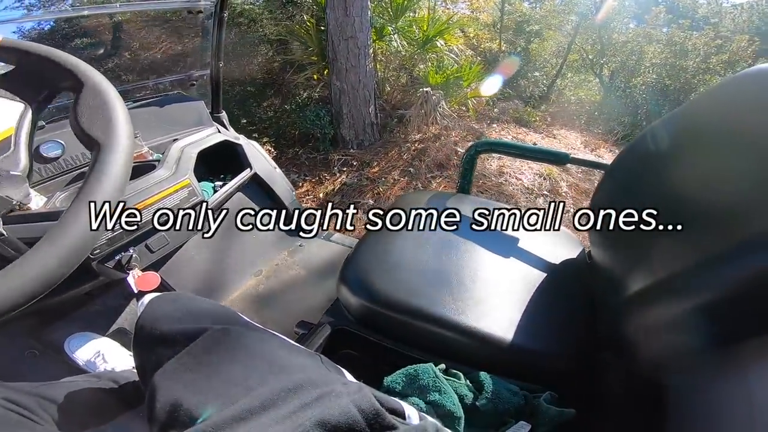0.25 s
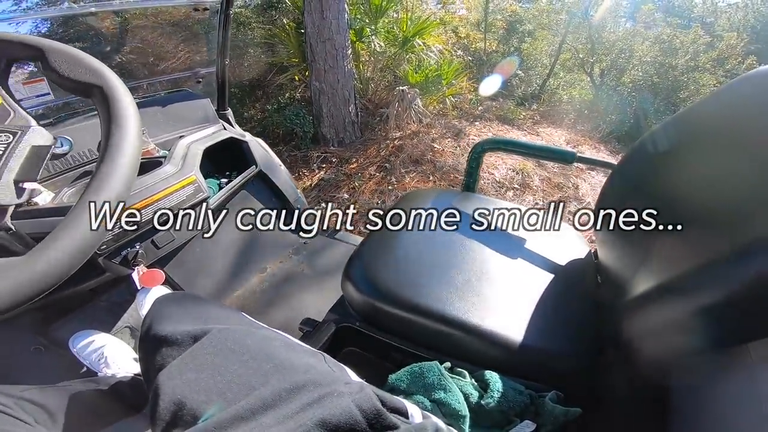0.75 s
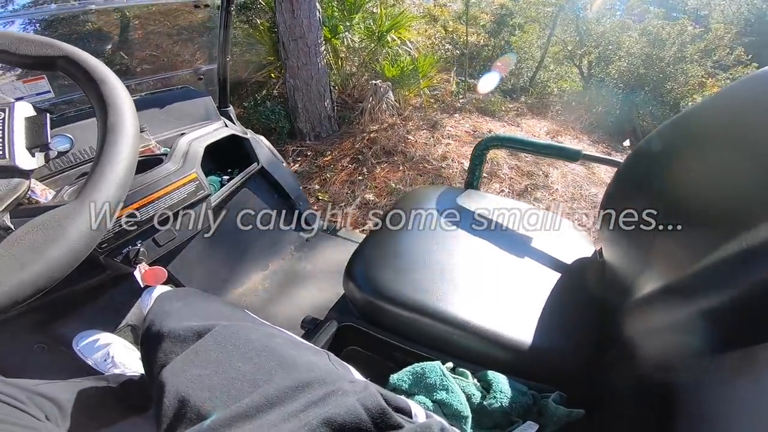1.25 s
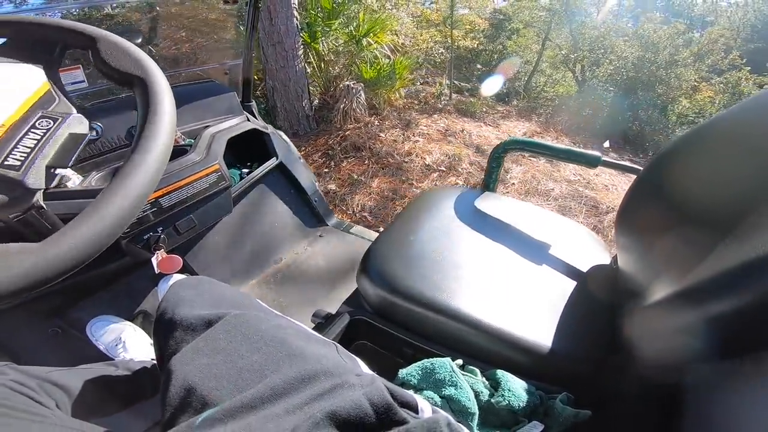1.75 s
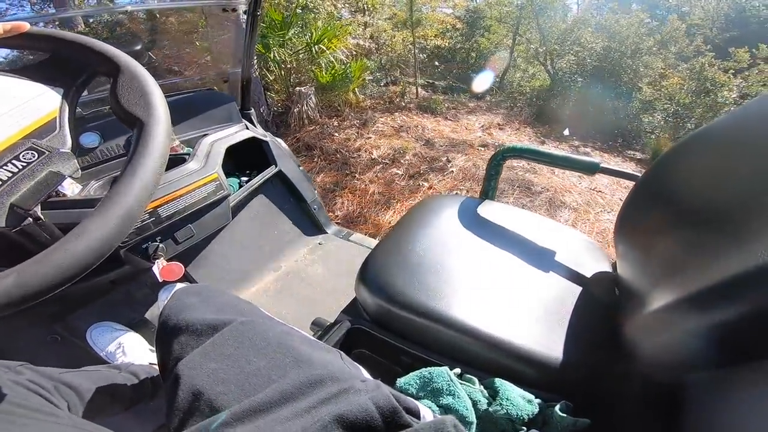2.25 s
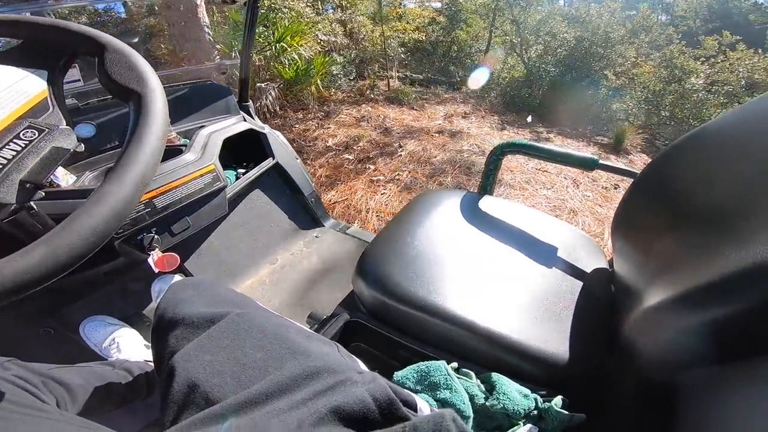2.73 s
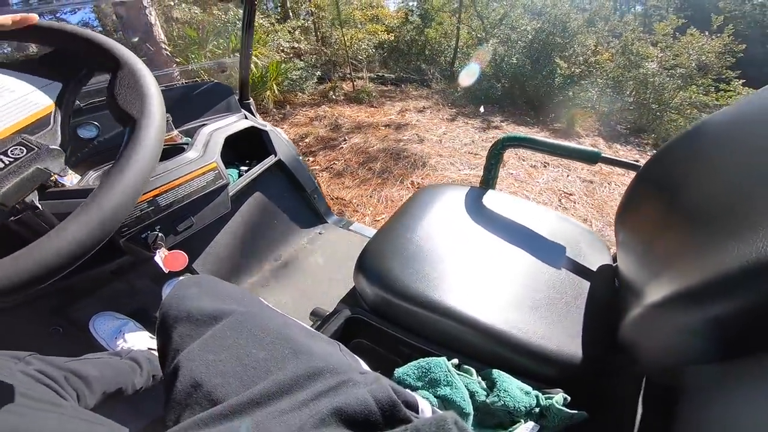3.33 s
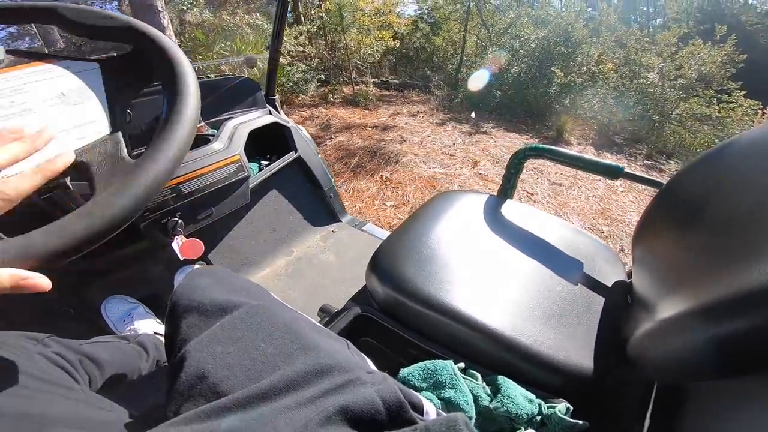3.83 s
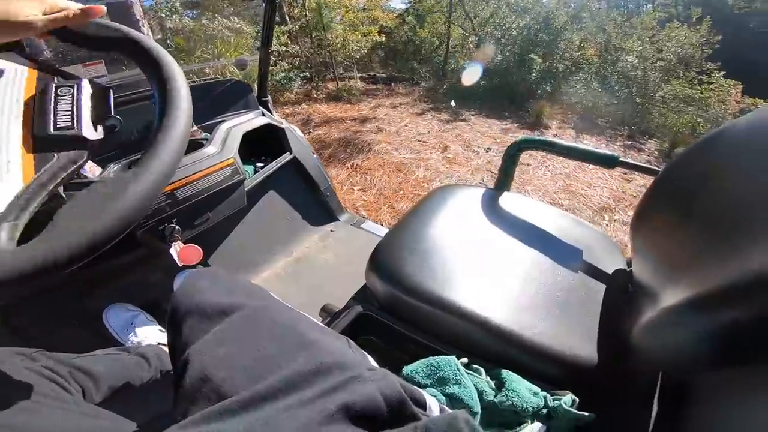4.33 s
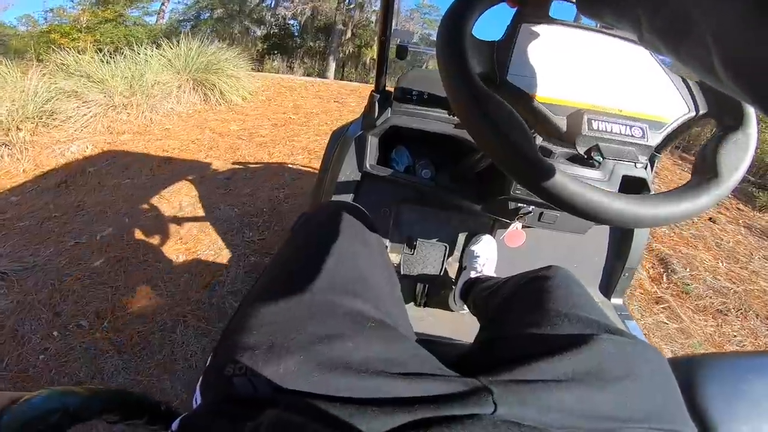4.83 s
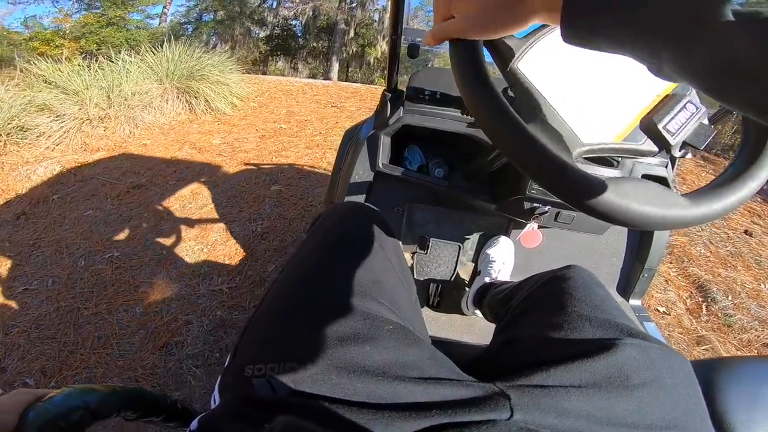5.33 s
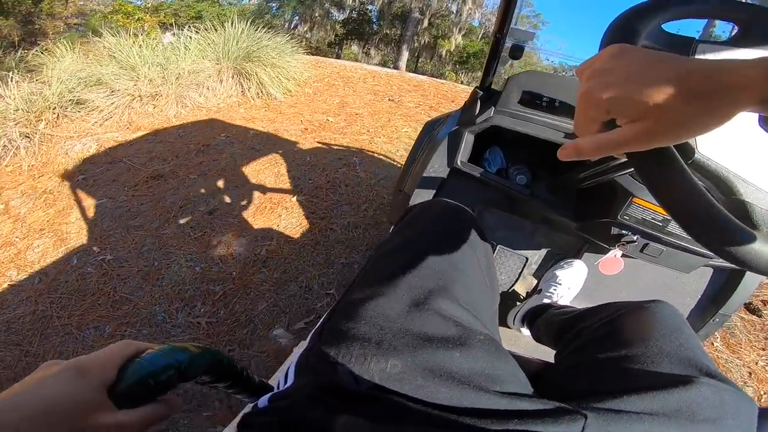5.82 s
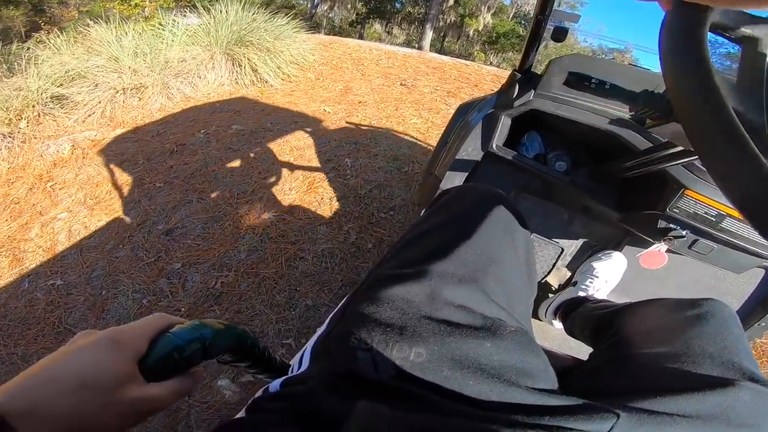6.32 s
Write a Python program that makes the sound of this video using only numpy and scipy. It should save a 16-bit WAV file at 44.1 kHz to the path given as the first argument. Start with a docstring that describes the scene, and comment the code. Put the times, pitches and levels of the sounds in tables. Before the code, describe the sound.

A petrol golf cart creeps over dry pine needles, chugging, squeaking and rattling, then pulls away louder and eases into a coast.

```python
"""Golf cart on pine straw

Heard from the seat. Each firing of the one-cylinder petrol engine booms in the muffler, barks in the pipe
and shakes the body. Needles crunch under the tyres, a dry joint squeaks, panels knock, a latch clacks.
The cart creeps; the sound fades out briefly and returns with it pulling hard, then coasting."""
import sys
import numpy as np
from scipy import signal
from scipy.fft import rfft, irfft, next_fast_len
from scipy.io import wavfile

SR = 44100
rng = np.random.default_rng(int(sys.argv[2]) if len(sys.argv) > 2 else 0)


def master(y):
    """Save y as 16-bit WAV."""
    cut = np.clip(np.atleast_2d(y).T, -1, 1)
    pcm = np.round(cut * 32767)  # scale
    wavfile.write(sys.argv[1], SR, pcm.astype(np.int16))


N = 289737
T = np.arange(N) / SR
FFT_SIZE = next_fast_len(N + SR // 4, real=True)
FREQ_HZ = np.maximum(np.arange(FFT_SIZE // 2 + 1) * SR / FFT_SIZE, 1)
PULL_START_S = 4.553

# Spectrum of crunching straw. Each row: frequency in Hz, relative level in dB.
STRAW_SPECTRUM = [(600, -8), (1500, 6), (2800, 6.5), (4000, -3), (5500, -9.5), (7500, -9.5), (9500, -29),
                  (11000, -23), (12500, -62), (14500, -70)]


def undb(db):
    """Decibels to gain."""
    return np.exp(np.asarray(db) * (np.log(10) / 20))


def unit(x):
    """Scale to rms 1."""
    return x / np.sqrt(np.mean(x ** 2))


def noise():
    """Two independent white noises."""
    return rng.standard_normal((2, N))


def wander(rate_hz):
    """Random drift, spread near 1."""
    return np.interp(T * rate_hz, np.arange(16384), 1.2 * rng.standard_normal(16384))


def curves(table):
    """Value columns of a timed table, per sample."""
    times_s, *columns = np.transpose(table)
    return [np.interp(T, times_s, column) for column in columns]


def layer_gains(effort, layers):
    """Gain of each layer, following engine effort."""
    effort_db = curves(effort)[0]
    return {name: undb(db + slope * effort_db) for name, (db, slope) in layers.items()}


def shape(points):
    """Gain per frequency from (Hz, dB) points."""
    hz, db = np.transpose(points)
    return undb(np.interp(np.log(FREQ_HZ), np.log(hz), db))


def resonance(hz, width_hz):
    """Response of one damped mode, peak 1."""
    return 1 / (1 + 1j * (FREQ_HZ ** 2 - hz ** 2) / (FREQ_HZ * width_hz))


def modes(table):
    """Summed response of damped modes."""
    return sum(undb(db) * resonance(hz, width_hz) for hz, width_hz, db in table)


def spread(pair, response, left_db):
    """Filter two excitations at unit power gain into mid and side: bass shared, treble wide."""
    # Each row: frequency in Hz, side over mid in dB.
    stereo_width = [(150, -15.5), (300, -22), (520, -6.5), (1000, -0.5), (2500, -5.5), (8000, 0.5)]
    spectra = rfft(pair, FFT_SIZE) * response / np.sqrt(np.mean(np.abs(response) ** 2))
    mid = irfft(spectra[0], FFT_SIZE)[:N]
    side = irfft(spectra[1] * shape(stereo_width), FFT_SIZE)[:N]
    return np.array([mid + side, mid - side]) * undb([[left_db / 2], [-left_db / 2]])


def add(track, start_s, sound):
    """Mix a sound in at start_s."""
    i = max(int(start_s * SR), 0)
    track[i:i + len(sound)] += sound[:N - i]


def blows(rows, rise_s):
    """Envelope of impacts. Each row: start in seconds, level in dB, decay in seconds."""
    out, t = np.zeros(N), T[:SR // 4]
    attack = 1 - np.exp(-(t / rise_s) ** 2)
    for start_s, db, decay_s in rows:
        add(out, start_s, undb(db) * attack * np.exp(-t / decay_s))
    return out


def count_cycles(firing_hz, zero_s):
    """Engine phase in cycles, with a firing at zero_s."""
    cycles = np.cumsum(firing_hz) / SR
    return cycles - np.interp(zero_s, T, cycles)


def throb(cycles, lag, swing_db):
    """One swell a cycle, peaking lag cycles after the firing."""
    return unit(undb(swing_db * np.cos(2 * np.pi * (cycles - lag))))


def cabin(x, wet_db, decay_s=0.016):
    """Roof, windscreen and seats scatter short echoes, different at each ear."""
    t = T[:SR // 10]
    echoes = rng.standard_normal((2, len(t))) * np.exp(-t / decay_s) * (t > .002)
    echoes = unit(echoes) / np.sqrt(len(t))
    return x + undb(wet_db) * signal.oaconvolve(x[None], echoes, axes=1)[:, :N]


def rumble():
    """Uneven ground shakes the chassis."""
    spectrum = shape([(14, -48), (28, -6), (45, 0), (100, 12), (170, .5), (240, -4.5),
                      (400, -40), (900, -57)])
    return spread(noise(), spectrum, left_db=-2.3)


def crunch(shake, patchy_db):
    """Dry needles rustle under the tyres in small clusters."""
    grains = noise() * undb(1.5 * np.minimum(rng.exponential(size=N), 7))
    clusters = undb(patchy_db * wander(45) + 1.1 * wander(400))
    return spread(unit(grains * shake * clusters), shape(STRAW_SPECTRUM), left_db=-2.8)


def twig_snaps(count=70, loudest_db=-37, range_db=15, decay_s=.002, low_cut_hz=3500):
    """At speed, single twigs snap at random under the tyres."""
    when, softness = rng.random((count, 2)).T
    starts_s = PULL_START_S + when * (T[-1] - PULL_START_S)
    levels_db = loudest_db - range_db * np.sqrt(softness)
    envelope = blows([(s, db, decay_s) for s, db in zip(starts_s, levels_db)], rise_s=.0003)
    response = shape(STRAW_SPECTRUM) / (1 + (low_cut_hz / FREQ_HZ) ** 4)
    return spread(envelope * noise(), response, left_db=-2.8)


def body_drone():
    """Narrow body modes drone as the cart gets going."""
    # Each row: frequency in Hz, width in Hz, relative gain in dB before squaring.
    body_modes = [(299.7, 17, 4.5), (411.2, 22, 3), (449, 60, -4)]
    # Each row: time in seconds, level in dB.
    levels = [(0, -38.5), (.22, -41), (.5, -37), (.7, -41.5), (1.0, -40)]
    return undb(curves(levels)[0]) * spread(noise(), modes(body_modes) ** 2, left_db=-.55)


def axle_whine():
    """The rear axle sings as the cart coasts."""
    # Each row: time in seconds, level in dB.
    levels = [(4.6, -59), (5.5, -53), (5.85, -38.5), (6.1, -52), (6.57, -64)]
    return undb(curves(levels)[0]) * spread(noise(), resonance(hz=903, width_hz=130) ** 2, left_db=-1)


def fitting_chirps(swell_s=.0029, rasp=.04):
    """Faint, scratchy chirps: small fittings rub for an instant, and at 1.988 s the squeaking joint's high
    partial sounds on its own."""
    # Each row: start in seconds, level in dB, pitch in Hz.
    rubs = [(1.916, -38, 4100), (1.988, -26, 5360), (2.352, -42.5, 5390), (3.398, -40, 5470),
            (3.442, -40.5, 4390), (5.976, -44, 4740), (6.172, -44, 3330), (6.313, -44, 6400)]
    out, t, flutter = np.zeros(N), T[:SR // 8], wander(1500)
    envelope = t / swell_s * np.exp(1 - t / swell_s)
    for start_s, db, hz in rubs:
        pitch_hz = hz * (1 + rasp * flutter[int(start_s * SR):][:len(t)])
        add(out, start_s, undb(db) * envelope * np.sin(2 * np.pi * np.cumsum(pitch_hz) / SR))
    return cabin(out, wet_db=-1, decay_s=.015)


def belt_chirp(start_s=.683, length_s=.089, hz=1220, arch=.032, level_db=-30):
    """The drive belt slips as it takes up; every other slip is weaker, adding half-order partials."""
    # Each row: multiple of the pitch, relative level in dB.
    partials = [(.5, -7), (1, 4.5), (1.5, -9), (2, -2.5), (3, -16), (3.5, -19.5), (4.5, -19), (6, -22)]
    progress = np.clip((T - start_s) / length_s, 0, 1)
    grip = np.sin(np.pi * progress).clip(0) ** .9
    pitch_hz = hz * (1 + arch * np.sin(np.pi * progress ** .9)) * (1 + .026 * wander(2200))
    phase = 2 * np.pi * np.cumsum(pitch_hz) / SR
    tone = sum(undb(db) * np.sin(k * phase) for k, db in partials)
    return cabin(tone * undb(level_db + .74 * wander(350)) * grip, wet_db=-5)


def joint_scrapes():
    """Pressed hard, the dry joint grates in uneven catches that ring its modes."""
    # Each row: start in seconds, level in dB, decay in seconds.
    scrapes = [(5.255, -40, 0.083), (5.304, -27, 0.014), (5.396, -34, 0.027)]
    # Each row: frequency in Hz, width in Hz, relative gain in dB.
    joint_modes = [(2610, 480, 2), (5240, 1100, -16.5), (7800, 1000, -21.5)]
    catches = blows(scrapes, rise_s=.0054) * undb(3.2 * wander(250)) * noise()
    response = sum(undb(db) * resonance(hz, width_hz) ** 2 for hz, width_hz, db in joint_modes)
    return spread(catches, response, left_db=-1.8)


def joint_squeaks(full_slip_s=.032, weak_db=-38.5, trim_db=-.44):
    """The dry joint slips about once a firing and sings; low notes hold steady, high ones rasp and bend."""
    # Each row: start in seconds, relative level in dB, pitch in Hz, brightness in dB.
    slips = [(0.001, -33, 2440, -3.5), (0.143, -42, 2456, -13.5), (0.812, -32, 2710, -17.5),
             (0.876, -29, 2665, -12), (0.941, -27, 2684, -12), (1.005, -27.5, 2650, -13),
             (1.067, -30.5, 2622, -10), (1.13, -31.5, 2747, -15.5), (1.177, -33, 2593, -8),
             (1.218, -30.5, 2438, -3), (1.279, -33, 2496, -5.5), (1.331, -29, 2447, -3),
             (1.39, -39, 2710, -21), (1.441, -30.5, 2485, -4), (1.505, -36, 2703, -18),
             (1.555, -33, 2757, -19), (1.655, -30.5, 2747, -16.5), (1.713, -33, 2760, -15.5),
             (1.764, -34.5, 2780, -19), (1.814, -34, 2735, -16), (1.859, -33.5, 2713, -14.5),
             (1.958, -28.5, 2685, -15), (2.009, -37, 2690, -13), (3.043, -35, 2433, -3.5),
             (3.562, -40, 2610, -35), (3.62, -39, 2595, -33), (3.974, -39, 2460, -9),
             (4.029, -40, 2627, -14), (4.295, -39, 2620, -15), (4.44, -37.5, 2403, -7)]
    # Each row: multiple of the pitch, relative level in dB, dB per dB of brightness.
    partials = [(2, 1.5, 0.58), (3, 6, 1.44), (4, -19, 1), (5, -36, 0.8)]
    # Each row: pitch in Hz, flutter and arch as shares of the pitch.
    grain = [(2470, .007, -.01), (2656, .031, .03), (2750, .03, .03)]
    grain_hz, rasps, arches = np.transpose(grain)
    out, flutter, grip = np.zeros(N), wander(1400), wander(450)
    for start_s, db, hz, bright_db in slips:
        share = np.clip(undb(db - weak_db), .7, 1)  # weak slips are shorter and scratchier
        progress = np.linspace(0, 1, int(share * full_slip_s * SR))
        span = int(start_s * SR) + np.arange(len(progress))
        rasp = (np.interp(hz, grain_hz, rasps) + .04 * (1 - share)) * (1.4 - .8 * progress)
        bend = np.interp(hz, grain_hz, arches) * (np.sin(np.pi * progress ** 1.51) - .8)
        phase = 2 * np.pi * np.cumsum(hz * (1 + bend + rasp * flutter[span])) / SR
        pressure = np.sin(np.pi * progress ** .32).clip(0) * undb(1.75 * grip[span])
        overtones = sum(undb(k_db + slope * bright_db) * np.sin(k * phase) for k, k_db, slope in partials)
        add(out, start_s, undb(db + trim_db) * pressure * (np.sin(phase) + pressure * overtones))
    return cabin(out, wet_db=4.5, decay_s=.014) * undb([[-1.5], [1.5]])


def panel_thud(envelope, dull_hz):
    """A blow sounds a hollow plastic panel; soft contact dulls it above dull_hz."""
    # Each row: frequency in Hz, relative level in dB.
    spectrum = [(100, -13), (250, 3), (480, 4.5), (680, 0.5), (1000, -4), (1400, -7), (2000, -12.5),
                (4000, -34), (9000, -89), (14000, -110)]
    # Each row: frequency in Hz, width in Hz, gain in dB re that spectrum.
    hollow_modes = [(496, 66, -45), (686, 14, -21), (912, 71, -4)]
    response = shape(spectrum) * (1 + modes(hollow_modes)) / np.hypot(1, (FREQ_HZ / dull_hz) ** 3)
    return spread(envelope * noise(), response, left_db=-3.5)


def panel_rings(strikes, rise_s=.0063, decay_s=.02):
    """A struck panel rings briefly at one wavering note."""
    out, t, flutter = np.zeros(N), T[:SR // 8], wander(500)
    envelope = (1 - np.exp(-(t / rise_s) ** 2)) * np.exp(-t / decay_s)
    for start_s, db, hz in strikes:
        pitch_hz = hz * (1 + .09 * flutter[int(start_s * SR):][:len(t)])
        add(out, start_s, undb(db) * envelope * np.sin(2 * np.pi * np.cumsum(pitch_hz) / SR))
    return cabin(out, wet_db=-9.5) * undb([[-1.5], [1.5]])


def panel_taps(decay_s=.015, ring_hz=503, ring_db=-14.5):
    """A loose panel taps its mount as the engine rocks."""
    # Each row: start in seconds, relative level in dB.
    taps = [(.118, -27), (0.273, -25), (.632, -18.5), (0.926, -19), (1.144, -21.5), (1.268, -19.5),
            (1.374, -21.5), (1.485, -23.5), (1.575, -22), (1.684, -23), (1.787, -25.5), (1.890, -20),
            (2.080, -36), (2.287, -21), (2.445, -41), (2.549, -50), (2.700, -24.5), (2.8, -21.5),
            (2.890, -23), (3.218, -37), (3.324, -39), (3.436, -33), (3.594, -21.5), (3.945, -38),
            (4.068, -30), (4.222, -30)]
    envelope = blows([(s, db, decay_s) for s, db in taps], rise_s=.012)
    thud = undb(.5) * panel_thud(envelope, dull_hz=890)
    return thud + panel_rings([(s, db + ring_db, ring_hz) for s, db in taps])


def panel_knocks(decay_s=.014):
    """Bumps throw the plastic panels against their mounts."""
    # Each row: start in seconds, relative thud and ring levels in dB, ring pitch in Hz.
    bumps = [(0.445, -20.5, -25.5, 696), (0.8, -20.5, -23, 474), (1.035, -21, -21.5, 504),
             (1.955, -17, -19.5, 693), (2.608, -21.5, -25.5, 597), (2.984, -16.5, -23, 711),
             (3.795, -16.5, -18, 693), (4.366, -19.5, -26.5, 518)]
    hits = [(s, db, decay_s) for s, db, _, _ in bumps]
    thud = panel_thud(blows(hits, rise_s=.0076), dull_hz=4000)
    ring = panel_rings([(s, db, hz) for s, _, db, hz in bumps])
    edge = spread(blows(hits, rise_s=.0004) * noise(), shape(STRAW_SPECTRUM), left_db=-1.5)
    return undb(-1.5) * thud + ring + undb(-17) * edge


def body_jolts(decay_s=.066):
    """Ruts jolt the whole body into a low thump."""
    # Each row: start in seconds, level in dB.
    ruts = [(0.443, -24), (0.809, -32), (2.24, -37), (3.14, -28), (4.378, -26)]
    # Each row: frequency in Hz, width in Hz, relative gain in dB.
    low_modes = [(228.4, 35, 1), (304, 52, -10.5), (419, 61, -6)]
    envelope = blows([(s, db, decay_s) for s, db in ruts], rise_s=.0042)
    return spread(envelope * noise(), modes(low_modes) / (1 + (FREQ_HZ / 700) ** 4), left_db=-.53)


def latch_clacks():
    """A latch clacks, hard and bright."""
    # Each row: start in seconds, relative level in dB, decay in seconds.
    clacks = [(0.4445, -27, 0.0028), (2.291, -29, 0.0058), (3.1379, -11.5, 0.016), (3.599, -34, 0.011),
              (3.716, -25, 0.01)]
    # Each row: frequency in Hz, relative level in dB.
    spectrum = [(400, -12), (1300, 6), (1900, -4.5), (2500, 9.5), (3300, -0.5), (4200, 8.5), (5200, -2),
                (6500, 3), (8500, -8), (11000, -16), (14000, -36.5)]
    contact = blows(clacks, rise_s=.0021) * noise() * undb(.94 * wander(360))
    return undb(-5.5) * spread(contact, shape(spectrum), left_db=-.4)


def panel_rattle(pulses, shake, repeat_db):
    """Loose panels buzz with the engine: partly alike on each cycle, partly at random."""
    # Each row: frequency in Hz, relative level in dB.
    spectrum = [(150, 2), (330, 8.5), (480, -1.5), (750, -4), (1000, -6), (1200, -10.5), (1900, -11),
                (2800, -30), (5000, -28.5), (10000, -38), (13000, -100)]
    # Each row: frequency in Hz, width in Hz, gain in dB re that spectrum.
    panel_modes = [(419, 15, -8), (525, 21, -3), (654, 24, -2), (898, 56, 6.5), (993, 34, 4.5)]
    t = T[:SR // 8]
    pattern = rng.standard_normal((2, len(t))) * np.exp(-t / .064)
    repeating = unit(signal.oaconvolve(pulses[None], pattern, axes=1)[:, :N])
    buzz = (noise() * undb(wander(70)) + undb(repeat_db) * repeating) * shake
    return spread(unit(buzz), shape(spectrum) * (1 + modes(panel_modes)), left_db=-3.5)


def canopy_chatter(cycles, firing_hz, screen_hz=981):
    """Slow firings shake the canopy and windscreen once a cycle."""
    # Each row: frequency in Hz, width in Hz, relative gain in dB.
    canopy_modes = [(530, 55, 12.5), (910, 70, -4), (951, 19, -3.5)]
    # Each row: firing rate in Hz, level in dB.
    levels = [(14.5, -37.5), (15.5, -51.5), (20, -55)]
    response = modes(canopy_modes) / (1 + (FREQ_HZ / 1250) ** 8)
    canopy = spread(throb(cycles, .88, 12) * noise(), response, left_db=-1)
    phase = 2 * np.pi * np.cumsum(screen_hz * (1 + .04 * wander(400))) / SR
    screen = cabin(throb(cycles, .9, 14) * np.sin(phase), wet_db=-22, decay_s=.009)
    return undb(np.interp(firing_hz, *np.transpose(levels))) * (canopy + screen)


def block_clatter(cycles):
    """The engine block clatters once a cycle under load."""
    # Each row: frequency in Hz, width in Hz, gain in dB before the band shaping.
    block_modes = [(1200, 210, -2.5), (1330, 80, -2.5), (1800, 170, -29), (2780, 660, -11)]
    band = shape([(600, -27), (1000, -3), (3000, -3.5), (6000, -11.5), (12000, -58.5)])
    return spread(throb(cycles, .78, 5.1) * noise(), modes(block_modes) * band, left_db=-1)


def pulse_train(cycles, scatter_db, jitter_s, limp_db=.2):
    """One pulse a cycle, alternately strong and weak, each a little off in size and time."""
    onsets = np.flatnonzero(np.diff(np.floor(cycles)))
    size_error, time_error = rng.standard_normal((len(onsets), 2)).T
    sizes = undb(limp_db * (-1) ** np.floor(cycles[onsets]) + scatter_db * size_error)
    jittered = np.clip(onsets + (jitter_s * SR * time_error).astype(int), 0, N - 1)
    pulses = np.zeros(N)
    pulses[jittered] = unit(sizes) * np.sqrt(np.gradient(onsets))  # same power at any rate
    return pulses


def muffler_hum(cycles):
    """The muffler hums at the firing rate and its third harmonic."""
    # Each row: multiple of the firing rate, relative level in dB.
    orders = [(1, -4.5), (3, 3.5)]
    tone = sum(undb(db) * np.sin(2 * np.pi * k * cycles) for k, db in orders)
    return unit(tone * undb(.49 * wander(36)))


def exhaust(pulses, cycles, chamber_modes, gas_db, top_hz):
    """Pulses and turbulent gas ring two chambers in series, so each putt swells and runs into the next."""
    gas = undb(gas_db) * throb(cycles, .2, 5) * noise()
    # Neighbouring pipe modes swing in opposite directions.
    chambers = sum((-1) ** k * undb(db) * resonance(hz, width_hz) ** 2
                   for k, (hz, width_hz, db) in enumerate(chamber_modes))
    return unit(spread(pulses + gas, chambers / (1 + (FREQ_HZ / top_hz) ** 4), left_db=-1.7))


def creeping():
    """Light throttle: the engine limps, thumping and shaking the body harder on every other cycle."""
    # Each row: time in seconds, firing rate in Hz.
    speed = [(0.0, 13.38), (0.61, 14.4), (0.71, 16.21), (2.03, 20.39), (2.48, 18.74), (2.94, 21.9),
             (4.46, 13.09)]
    # Each row: time in seconds, engine effort in dB re steady creeping.
    effort = [(0, -16), (.4, -2), (.66, -1), (.77, 11), (.84, 5), (1.4, 4), (2.85, 0.5), (3.75, -2),
              (3.98, -1.5), (4.28, -5.5), (4.44, 8)]
    # Each layer: level in dB at effort 0, dB per dB of effort.
    layers = {"bark": (-40, 0.44), "crunch": (-47, 0.3)}
    # Each row: time in seconds, hum level in dB, boom level in dB.
    low_levels = [(0, -40, -34.5), (.25, -38.5, -35.5), (.45, -37, -40.5), (.65, -50, -27.5),
                  (.775, -55, -42), (.83, -29, -25.5), (1.0, -31, -27.5), (1.2, -25, -30.5),
                  (2.0, -25, -30.5), (2.75, -24, -30), (3.0, -26.5, -30.5), (3.7, -24.5, -32),
                  (4.0, -38, -34.5), (4.25, -35, -33), (4.45, -42, -28)]
    # Each row: time in seconds, level in dB.
    rattle_levels = [(0, -38), (.36, -41), (.5, -34.5), (.68, -37), (.9, -34.5), (1.3, -37.5), (2.1, -36.5),
                     (3.2, -36.5), (3.9, -38), (4.3, -38), (4.44, -33)]
    # Each row of both: frequency in Hz, width in Hz, relative gain in dB.
    muffler_modes = [(20.2, 1.9, -8), (51.8, 17.2, 2), (95, 70, -2), (129.4, 54, -14)]
    pipe_modes = [(213.6, 34, -1.5), (254.5, 17.4, 2.5), (296, 20.5, -3.5), (418, 40, -32), (544, 44, -58)]
    gain = layer_gains(effort, layers)
    hum_db, boom_db = curves(low_levels)
    cycles = count_cycles(curves(speed)[0], zero_s=1.02)
    pulses = pulse_train(cycles, scatter_db=1.5, jitter_s=.0005, limp_db=5)
    boom = exhaust(pulses, cycles, muffler_modes, gas_db=-12, top_hz=220)
    bark = exhaust(pulses, cycles, pipe_modes, gas_db=1, top_hz=750) * throb(cycles / 2, .47, 1.7)
    hum = muffler_hum(cycles)
    drone = body_drone()
    low_end = boom + undb(-6) * rumble()
    chug = throb(cycles, .42, 1) * throb(cycles / 2, .35, .73)
    rattle = panel_rattle(pulses, chug, repeat_db=-5)
    straw = crunch(throb(cycles, .41, 1), patchy_db=2)
    return (undb(hum_db) * hum + undb(boom_db) * low_end + gain["bark"] * bark + drone
            + undb(curves(rattle_levels)[0]) * rattle + gain["crunch"] * straw)


def pulling():
    """Open throttle: even firings bark in the pipe; off throttle the engine slows and the cart coasts."""
    # Each row: time in seconds, firing rate in Hz.
    speed = [(4.6, 19.48), (5.42, 21.5), (5.69, 20.78), (5.88, 16.9), (6.19, 14.47), (6.57, 14.41)]
    # Each row: time in seconds, engine effort in dB re open throttle.
    effort = [(4.62, -2.5), (5.25, 1.5), (5.71, -2.5), (5.78, -14), (6.02, -15), (6.4, -8), (6.57, -7)]
    # Each layer: level in dB at effort 0, dB per dB of effort.
    layers = {"boom": (-18.5, 0.42), "bark": (-22, 0.96), "rattle": (-30.5, 0.34), "crunch": (-44, 0.3),
              "clatter": (-46, 1), "thud": (-32.5, 0.7)}
    # Each row of all three: mode frequency in Hz, width in Hz, relative gain in dB.
    muffler_loaded = [(44.6, 14, 14), (58.8, 30, 7), (101.6, 49, 7.5), (140.7, 6.9, 4)]
    muffler_coasting = [(31, 7.8, -32), (68.5, 60, 5), (86.3, 7.1, 0), (125.4, 15, 0.5)]
    pipe_loaded = [(262, 57, 0.5), (308, 47, -2), (387, 160, -17.5), (585, 52, -13)]
    gain = layer_gains(effort, layers)
    firing_hz = curves(speed)[0]
    cycles = count_cycles(firing_hz, zero_s=4.692)
    load = np.interp(firing_hz, [17, 19.3], [.15, 1])
    gas_db = np.interp(firing_hz, [17, 19.3], [0, -8])
    intake_lag, pipe_lag, echo_lag = .345, .059, .3  # cycles

    # The intake gulps after each exhaust pulse.
    pulses = pulse_train(cycles, scatter_db=.6, jitter_s=.00012)
    gulps = pulse_train(cycles - intake_lag, scatter_db=.8, jitter_s=.0002)
    hard = exhaust(unit(pulses + .4 * gulps), cycles, muffler_loaded, gas_db=-21, top_hz=220)
    soft = exhaust(unit(pulses + .6 * gulps), cycles, muffler_coasting, gas_db=-14, top_hz=220)
    boom = np.sqrt(load) * hard + np.sqrt(1 - load) * soft

    # Each puff comes back softer from the end of the pipe, a third of a cycle later.
    puffs = pulse_train(cycles - pipe_lag, scatter_db=1.2, jitter_s=.0002)
    pipe_echoes = pulse_train(cycles - pipe_lag - echo_lag, scatter_db=1.2, jitter_s=.0002)
    bark = exhaust(unit(puffs + undb(-2.5) * pipe_echoes), cycles - .5, pipe_loaded, gas_db, top_hz=750)

    clatter = block_clatter(cycles)
    chatter = canopy_chatter(cycles, firing_hz)
    thud = panel_thud(throb(cycles, .68, 8), dull_hz=900)
    axle = axle_whine()
    rattle = panel_rattle(pulses, throb(cycles, .91, 2), repeat_db=4)
    low_end = throb(cycles, .38, 1.5) * (boom + undb(-15) * rumble())  # surges with each power stroke
    straw = crunch(throb(cycles, .88, 2.5), patchy_db=1.5)
    return (gain["boom"] * low_end + gain["bark"] * bark + gain["thud"] * thud + axle + chatter
            + gain["clatter"] * clatter + gain["rattle"] * rattle + gain["crunch"] * straw)


def scene():
    """Creeping, then pulling away, joined by a brief fade."""
    fade_out_s, fade_in_s = .097, .077
    fade = np.interp(T - PULL_START_S, [-fade_out_s, 0, fade_in_s], [1, 0, 1]) ** .95
    ride = np.where(T < PULL_START_S, creeping(), pulling())
    impacts = panel_knocks() + body_jolts() + latch_clacks() + panel_taps()
    friction = joint_squeaks() + joint_scrapes() + fitting_chirps() + belt_chirp()
    return (ride + impacts + friction + twig_snaps()) * fade


def record(dry):
    """Steep low-pass at 14.9 kHz."""
    return signal.sosfilt(signal.ellip(8, .2, 80, 14900, fs=SR, output="sos"), dry)


dry = scene()
out = record(dry)
master(out)
```